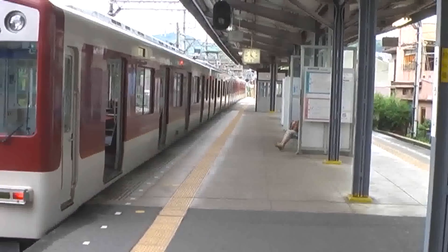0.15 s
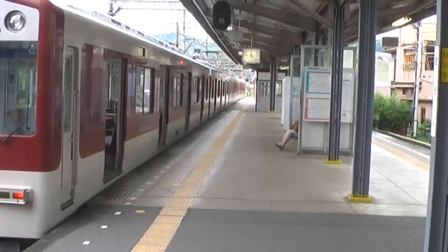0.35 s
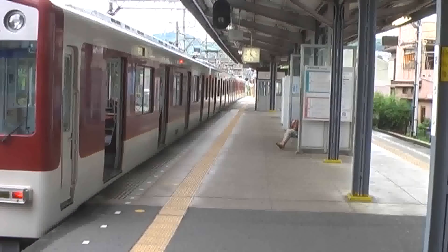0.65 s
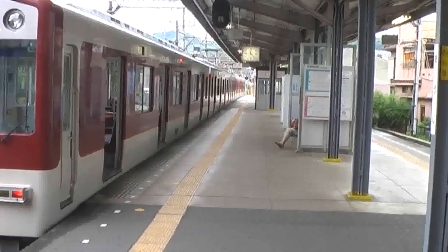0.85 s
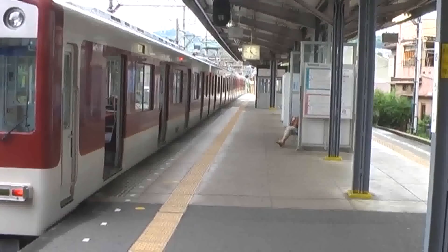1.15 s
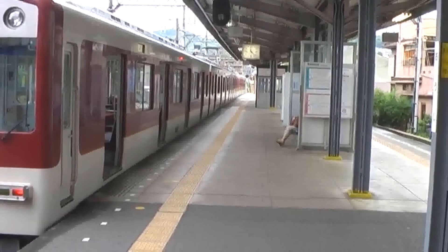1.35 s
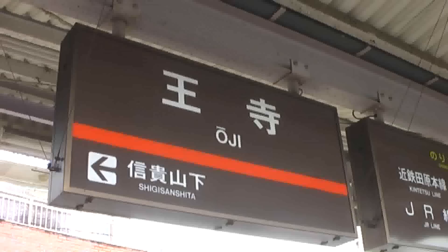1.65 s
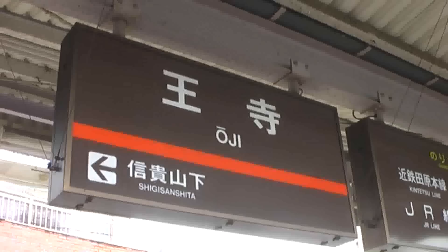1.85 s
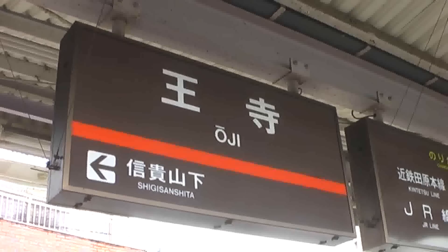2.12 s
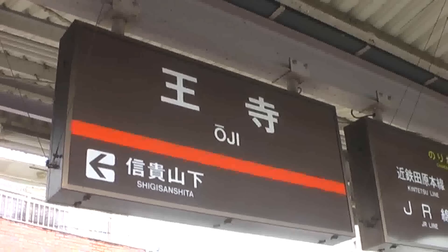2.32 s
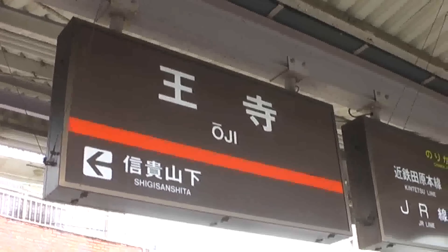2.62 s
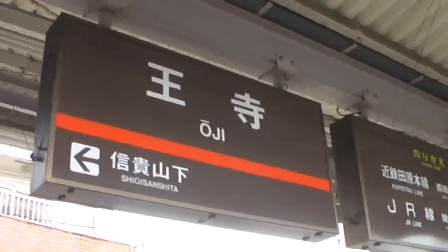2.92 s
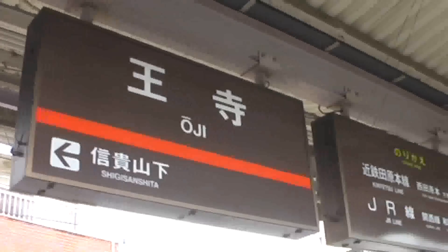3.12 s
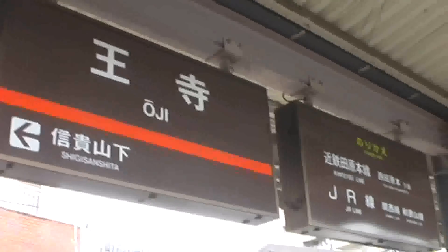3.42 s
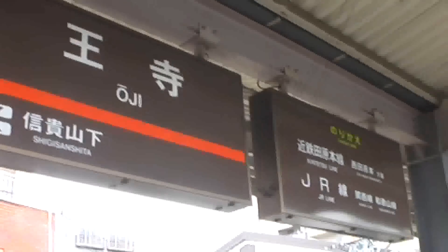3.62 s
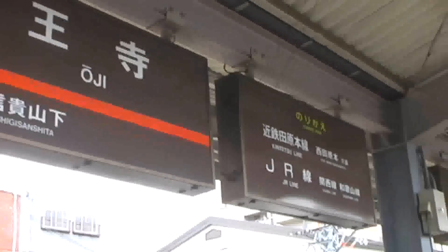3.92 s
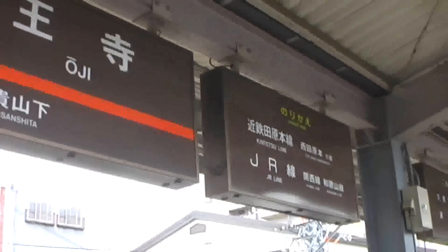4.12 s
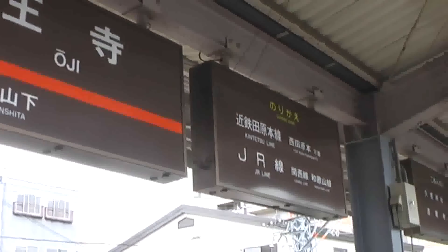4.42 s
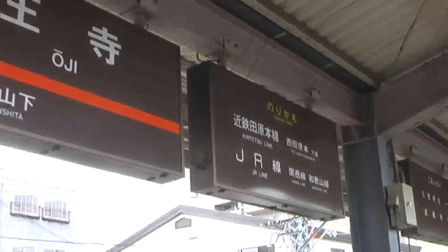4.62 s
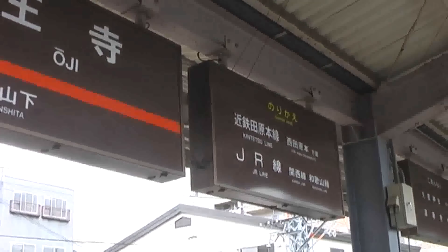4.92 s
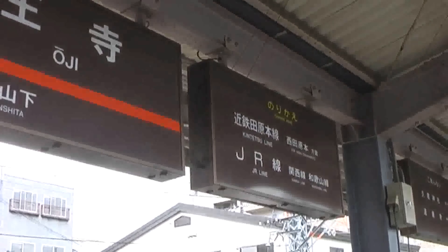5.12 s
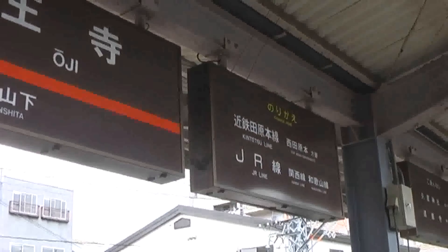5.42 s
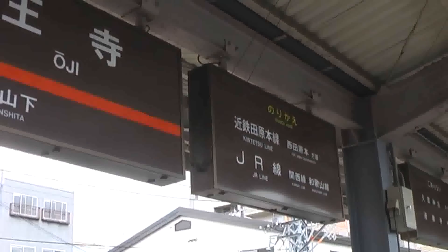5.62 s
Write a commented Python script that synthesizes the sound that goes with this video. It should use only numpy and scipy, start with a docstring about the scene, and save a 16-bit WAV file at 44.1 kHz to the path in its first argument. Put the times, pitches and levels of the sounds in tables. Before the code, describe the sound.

Steady low fan noise from a parked train, an early hiss of compressed air, a split-second gap, then fuller blower noise with a swelling electrical hum.

```python
"""An electric commuter train stands at a roofed platform, its fans and auxiliary machines running.
First, down the platform, filtered noise makes a low drone and an air rush, and a valve lets off one short puff.
The sound drops out for a moment, leaving a faint hiss, and resumes from a spot nearer the blowers.
There the hum of a motor-generator, two wavering sines, swells as the microphone turns."""
import sys
import numpy as np
from scipy import signal
from scipy.fft import rfft, irfft
from scipy.io import wavfile

SR = 44100
rng = np.random.default_rng(int(sys.argv[2]) if len(sys.argv) > 2 else 0)


def transcribe(u):
    """Save the signal u as a 16-bit wav file named by the first command-line argument.

    u: samples, shape (n,) or (channels, n), limited to [-1, 1]; the rate is SR.
    q: integer samples, one column per channel.
    """
    v = np.clip(np.atleast_2d(u).T, -1, 1)
    q = np.round(v * 32767).astype(np.int16)
    wavfile.write(sys.argv[1], SR, q)


N = 254016

# the break between the far spot and the near one
BREAK_START_S, BREAK_END_S = 1.573, 1.618
TIME = np.arange(N) / SR  # seconds
BINS = np.maximum(np.arange(N // 2 + 1) * SR / N, 1)  # Hz, kept above zero for the log axis
LEFT_RIGHT = np.array([[1], [-1]])


def from_db(db):
    """Decibels to gain."""
    return 10 ** (np.asarray(db) / 20)


def rms_one(x):
    """Scale to unit power, over both sides together."""
    return x / np.sqrt(np.mean(x ** 2) + 1e-20)


def over_hz(points):
    """A table read at every frequency, on a log axis."""
    hz, value = np.transpose(points)
    return np.interp(np.log(BINS), np.log(hz), value)


def drift(rate_hz):
    """Random wander of spread 1, mostly slower than the given rate."""
    spectrum = rfft(rng.standard_normal(N))
    return rms_one(irfft(spectrum / (1 + (BINS / rate_hz) ** 2), N))


def ramp(start_s, length_s):
    """A straight rise from 0 to 1."""
    return np.clip((TIME - start_s) / length_s, 0, 1)


def envelope(start_s, attack_s, hold_s, fall_db_per_s):
    """Gain that rises to 1, holds, then dies away."""
    falling_s = np.maximum(TIME - start_s - attack_s - hold_s, 0)
    return ramp(start_s, attack_s) * from_db(-fall_db_per_s * falling_s)


def by_spot(far, near):
    """The far spot is heard before the middle of the break, the near one after it."""
    return np.where(TIME < (BREAK_START_S + BREAK_END_S) / 2, far, near)


def turbulence(colour, booms=()):
    """Stereo spectrum of rushing air, lifted at its resonances; reflections make the two sides differ."""
    # Stereo image of the air noise. Each row: frequency in Hz, left-right likeness from 0 to 1.
    likeness = [(30, 0.78), (100, .99), (300, 0.975), (600, 0.88), (1000, 0.73), (2200, 0.58), (3300, 0.67),
                (4500, 1)]
    # Each row: frequency in Hz, left minus right in dB.
    balance = [(80, 1.3), (250, -0.86), (600, -0.48), (1500, -1.6), (2800, -1.5), (4800, -0.087)]
    level_db = over_hz(colour)
    for hz, width, lift_db in booms:
        level_db = level_db + lift_db / (1 + (2 * (BINS - hz) / width) ** 2)
    alike = np.clip(over_hz(likeness), 0, 1)
    mid, side = rfft(rng.standard_normal((2, N)))
    image = np.sqrt(1 + alike) * mid + LEFT_RIGHT * np.sqrt(1 - alike) * side
    return from_db(level_db + LEFT_RIGHT * over_hz(balance) / 2) * image


def hiss(level_db, colour):
    """Steady noise of a given colour and RMS level."""
    return from_db(level_db) * rms_one(irfft(turbulence(colour), N))


def wandering(spectrum):
    """Noise in overlapping registers, most wandering slightly in level, the one at 320 Hz steady."""
    # Registers of the drone. Each row: centre in Hz, depth of the wander in dB (either sign).
    registers = [(120, -0.35), (240, 0.5), (320, 0), (440, 1.3)]
    centres, depths_db = np.transpose(registers)
    total = 0
    for only, depth_db in zip(np.eye(len(registers)), depths_db):
        share = over_hz(np.c_[centres, only])  # 1 at its own centre, 0 at the others
        total = total + irfft(spectrum * share, N) * from_db(depth_db * drift(3))
    return total


def fans(colour, booms, drone_db, rush_db, flutter_db, split_hz=450):
    """Fan noise: the wandering drone of the casings below, the fluttering rush of the outlets above."""
    air = turbulence(colour, booms)
    low_share = 1 / (1 + (BINS / split_hz) ** 8)
    drone = rms_one(wandering(air * low_share))
    rush = rms_one(irfft(air * (1 - low_share), N))
    return drone * from_db(drone_db) + rush * from_db(rush_db + flutter_db * drift(16.0))


def air_valve(sputter_db):
    """A short, sputtering jet of compressed air, bright then fuller; a thin leak outlasts it."""
    # Colours of the puff, the leak past the valve seat and the blast.
    # Each row: frequency in Hz, relative level in dB per Hz.
    puff_colour = [(1500, -18), (3000, 0), (4200, 3), (6500, -3), (8800, -5), (11000, -14)]
    leak_colour = [(2500, -32), (4500, 1.5), (6500, 18.5), (7600, 8.5), (8800, -29)]
    blast_colour = [(600, -30), (1500, -2.5), (2400, 7), (4000, -10), (6500, -18), (9000, -55)]
    valve_s, opening_s = 0.3, 0.05
    jet_open = 1 - ramp(0.435, 0.058)  # the jet is pinched off

    puff = hiss(-34, puff_colour)
    puff = puff * envelope(valve_s, opening_s, hold_s=0.031, fall_db_per_s=95) * jet_open
    leak = hiss(-52, leak_colour)
    leak = leak * envelope(valve_s, opening_s, hold_s=0.42, fall_db_per_s=76)
    # the fuller blast joins when the valve is nearly wide open
    blast = hiss(-31, blast_colour)
    blast = blast * envelope(0.343, attack_s=0.005, hold_s=0.010, fall_db_per_s=85)
    return (puff + blast) * from_db(sputter_db * drift(60)) + leak


def generator(waver_db, octave_waver_db, phase_wander, left_lead):
    """A steady rotor hums with its octave; the octave wavers more. Phases are in radians."""
    # At the near spot the microphone moves through the hum's standing waves.
    # Each row: time in seconds, fundamental in dB, octave in dB.
    near_hum = [(1.95, -23, -43), (2.45, -26, -29), (3.45, -26.5, -26.5), (3.7, -22, -29.5),
                (4.3, -19.5, -32.5), (4.6, -18, -31), (5.05, -17.5, -36.5), (5.35, -17.5, -25.5),
                (5.75, -19, -33)]
    hum_hz, far_hum_db, far_octave_db = 152.85, -32, -46
    s, near_hum_db, near_octave_db = np.transpose(near_hum)
    hum_db = by_spot(far_hum_db, np.interp(TIME, s, near_hum_db))
    octave_db = by_spot(far_octave_db, np.interp(TIME, s, near_octave_db))

    phase = 2 * np.pi * hum_hz * TIME + phase_wander * drift(1.5)
    phase = phase + left_lead * np.array([[1], [0]])  # the left side runs ahead
    first = from_db(hum_db + waver_db * drift(4.0)) * np.sin(phase)
    octave_gain = from_db(octave_db + octave_waver_db * drift(7.4))
    second = octave_gain * np.sin(2 * phase + 0.7 * drift(1.5))
    return np.sqrt(2) * (first + second)  # makes the dB levels RMS


def scene():
    """First the far spot with the valve's puff, then the near one; the hum runs through both."""
    # Fan noise down the platform and near the blowers.
    # Each row: frequency in Hz, relative level in dB per Hz.
    far_rush = [(25, -36.5), (55, -31.5), (78, -23), (115, -9.5), (160, -6), (188, -8.5), (240, -2.5),
                (300, -4.5), (350, -6), (410, -10.5), (680, -11.5), (1150, -12.5), (1600, -19), (2800, -24),
                (4500, -32), (6300, -39.5), (7400, -50), (8500, -95.5)]
    near_rush = [(25, -37.5), (55, -27), (80, -20), (112, -3.5), (190, -2.5), (290, 0.5), (420, -3.5),
                 (700, -6), (1150, -14), (1600, -16), (2800, -21.5), (4200, -28), (6400, -37), (7400, -49),
                 (8500, -95)]
    # Booming air spaces of the ducts and under the cars, for each spot.
    # Each row: centre in Hz, width in Hz, lift in dB.
    far_booms = [(57, 10, 13), (125.8, 9.1, 10.5), (243, 14, 1.5), (510, 24, 4.5), (601, 37, 6.5),
                 (680, 26, 3.5), (727, 140, 4)]
    near_booms = [(58.3, 16, 3.7), (110, 7, 2.2), (125, 19, 4.5), (234, 21, 3), (283, 9.5, 1.8),
                  (349, 5.1, 1.8), (454, 52, 2.8), (1036, 110, 3), (1230, 240, 3.1)]

    far = fans(far_rush, far_booms, drone_db=-21, rush_db=-26, flutter_db=0.5)
    # the near drone comes back softly, 4.5 dB down at first
    near_drone_db = -18.5 - 4.5 * (1 - ramp(BREAK_END_S, 0.074))
    near = fans(near_rush, near_booms, near_drone_db, rush_db=-22, flutter_db=0.33)
    # the fan noise near the blowers stays practically steady
    near = near * from_db(0.08 * ramp(3.2, 1.47))
    hum = generator(waver_db=0.74, octave_waver_db=-1.5, phase_wander=0.15, left_lead=0.13)
    return by_spot(far, near) + hum + air_valve(sputter_db=1.0)


def record(dry):
    """The sound breaks off briefly between the two spots, leaving a faint hiss that grows; the top is cut."""
    # Hiss inside the break. Each row: frequency in Hz, relative level in dB per Hz.
    hiss_colour = [(100, -1), (3500, -2), (6500, -4.5), (8000, -40)]
    fade_out_s, fade_in_s = 0.016, 0.007
    start_depth_db, start_hiss_db, rise_db = -48, -55.5, 10.5  # the rise lifts both
    cutoff_hz = 10400  # from here up, at least 70 dB down

    muted = ramp(BREAK_START_S - fade_out_s, fade_out_s) - ramp(BREAK_END_S, fade_in_s)
    creep_db = rise_db * ramp(BREAK_START_S, BREAK_END_S - BREAK_START_S)
    inside = dry * from_db(start_depth_db) + hiss(start_hiss_db, hiss_colour)
    inside = inside * from_db(creep_db)
    broken = (1 - muted) * dry + muted * inside
    top_cut = signal.cheby2(14, 70, cutoff_hz, fs=SR, output="sos")
    return signal.sosfilt(top_cut, broken)


dry = scene()
out = record(dry)
transcribe(out)
```